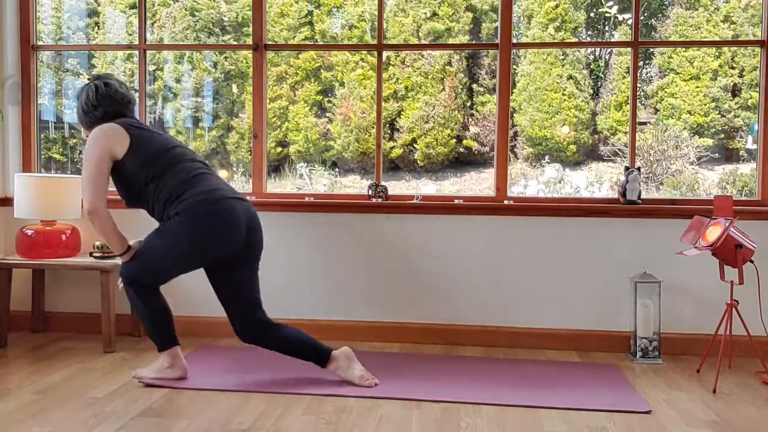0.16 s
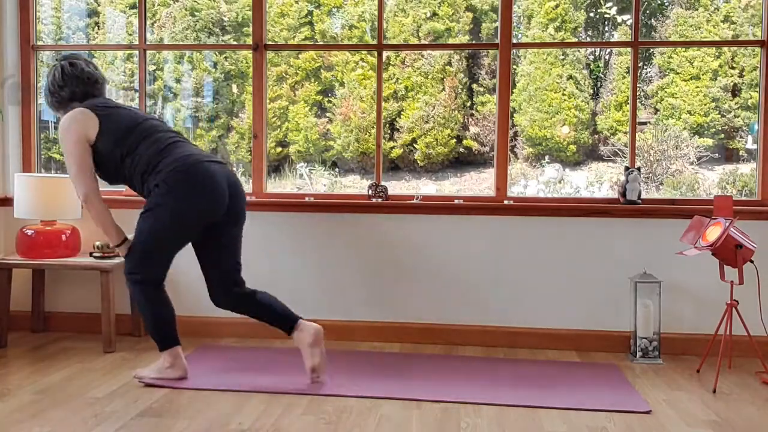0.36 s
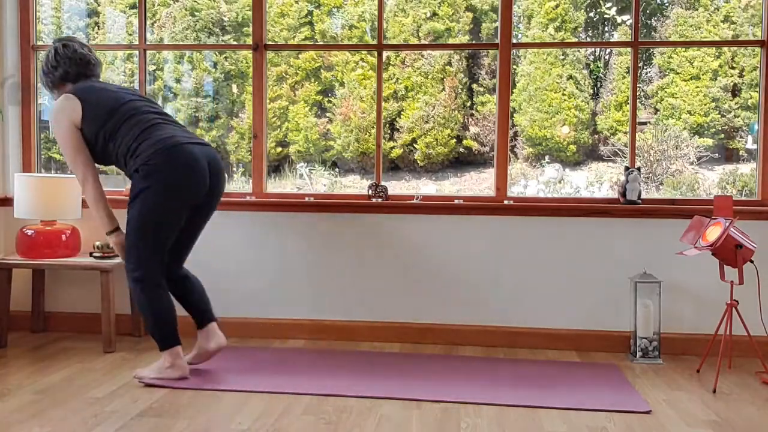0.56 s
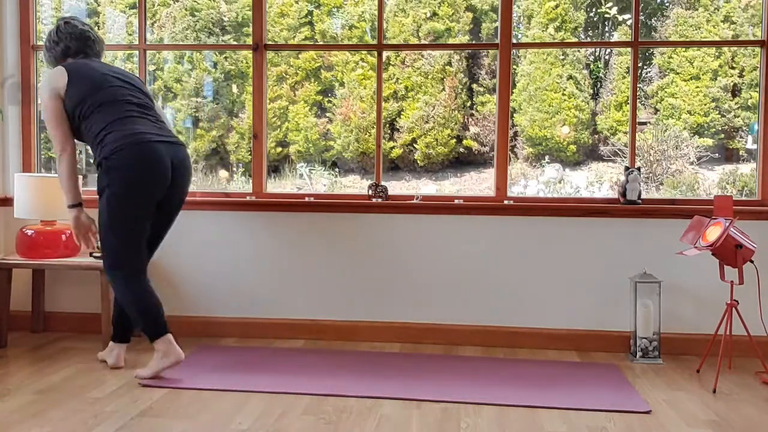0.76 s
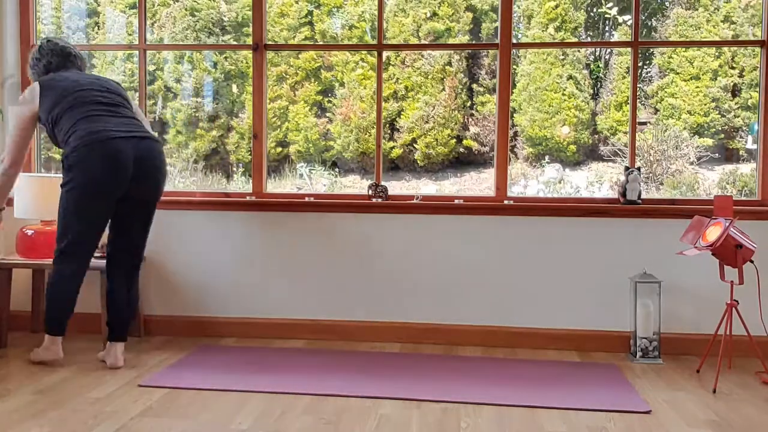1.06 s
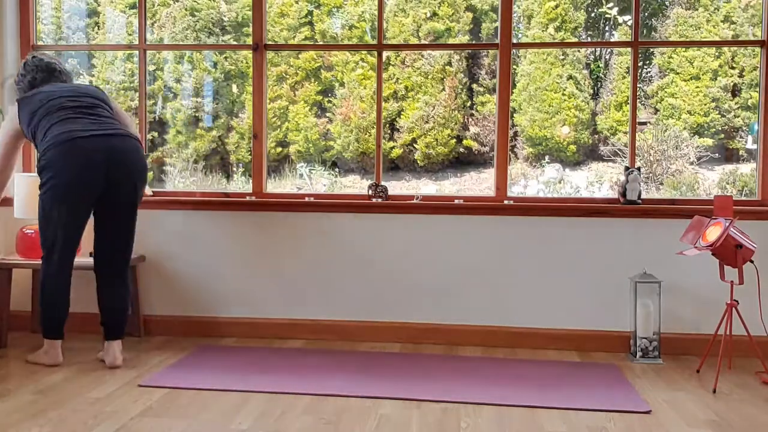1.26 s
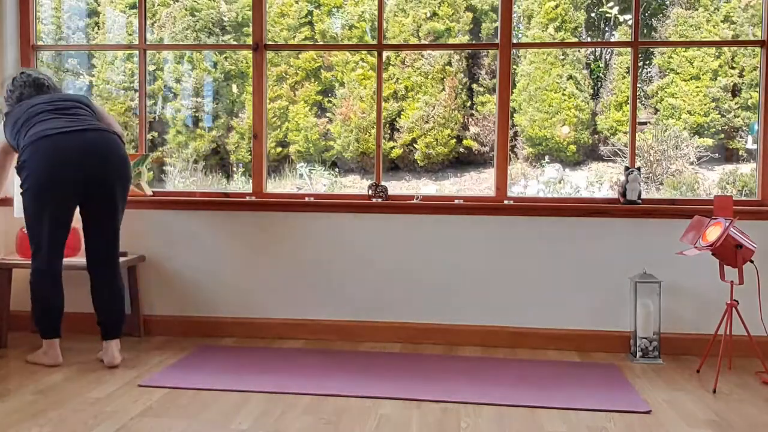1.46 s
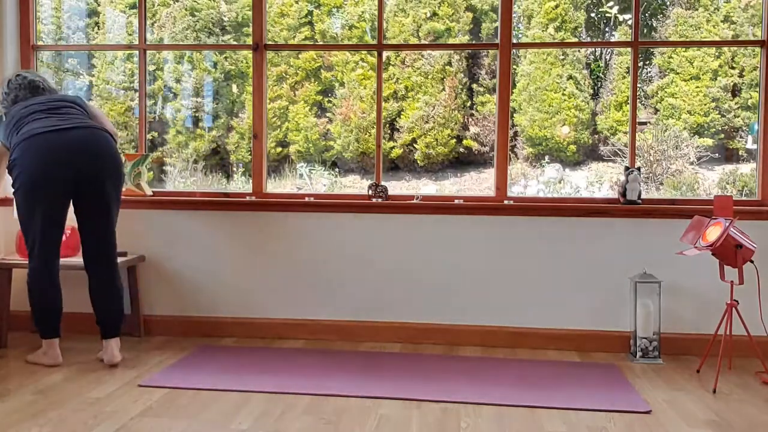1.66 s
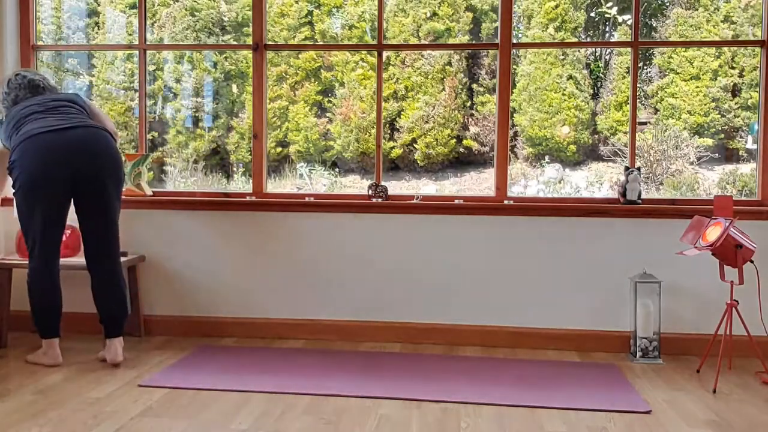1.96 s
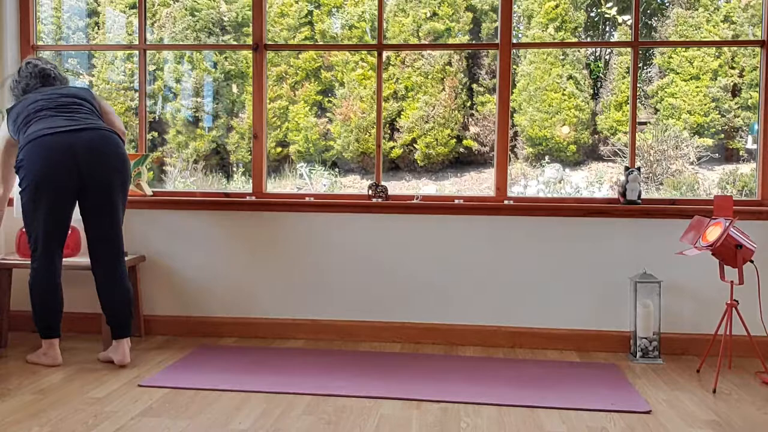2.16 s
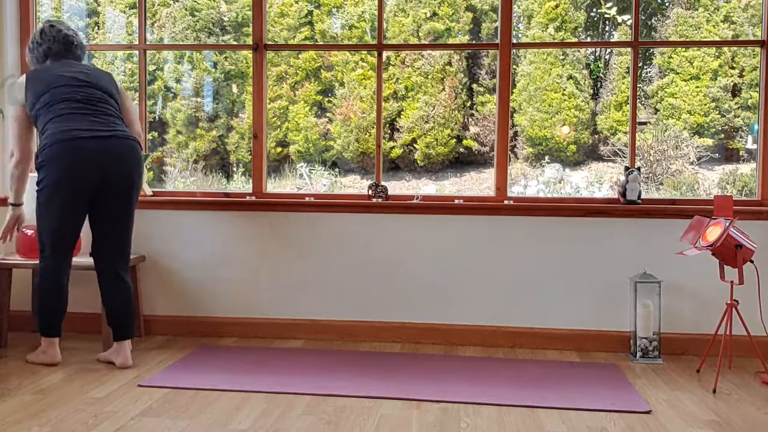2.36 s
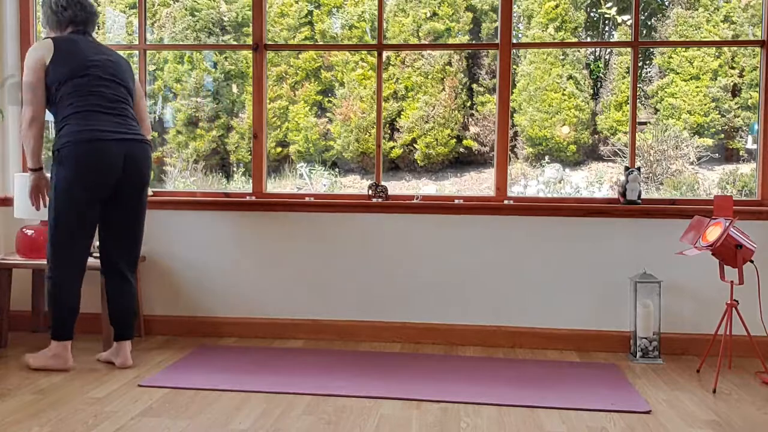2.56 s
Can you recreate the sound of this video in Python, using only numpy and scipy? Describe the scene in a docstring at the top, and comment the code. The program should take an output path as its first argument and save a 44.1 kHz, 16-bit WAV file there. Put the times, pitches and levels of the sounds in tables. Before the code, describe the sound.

Clothing swishes and rustles as someone gets up in a slightly echoing room. A swish and sharp double crack come at 0.2 seconds, light toe taps at 0.5, then a brief squeak and another swish around 0.8. Soft barefoot steps and board ticks follow, with very faint bird chirps from 1.4 to 1.9. The loudest swish comes with bright joint or board cracks around 2.3, over faint hiss.

```python
"""Barefoot rise from a lunge.

Someone rises and steps across a wooden floor in a bright, bare room. Clothing swishes with each big
move and rustles in between. Joints or boards crack sharply; the boards tick and squeak under soft
heel thuds and toe taps. The room rings on over a faint hiss and a far bird."""
import sys
import numpy as np
from scipy import signal
from scipy.fft import rfft, irfft, next_fast_len
from scipy.io import wavfile
from scipy.ndimage import uniform_filter1d, minimum_filter1d

SR = 44100
rng = np.random.default_rng(int(sys.argv[2]) if len(sys.argv) > 2 else 0)


def pcm_store(signal):
    """Save signal as 16-bit PCM."""
    levels = np.round(np.clip(np.atleast_2d(signal), -1, 1) * 32767)
    wavfile.write(sys.argv[1], SR, levels.astype(np.int16).T)


N = 119070
TIME_S = np.arange(N) / SR
FFT_SIZE = next_fast_len(2 * N)
FREQS_HZ = np.maximum(np.fft.rfftfreq(FFT_SIZE, 1 / SR), 1)

# Background hiss spectrum. Each row: frequency in Hz, gain in dB.
HISS_SPECTRUM = [(25, -48.5), (60, -28), (110, -9.5), (165, -2.5), (250, 2.5), (370, -17.5), (600, -4),
                 (800, -18), (1100, -3.5), (1700, -19), (3500, -12.5), (5500, -8), (6600, -10),
                 (7150, -1.5), (8200, -8.5)]
# Hiss envelope. Each row: time in seconds, level in dB.
HISS_ENVELOPE = [(0, -51), (1.7, -53.5), (2.4, -52), (2.7, -63)]
# Garden bird chirps. Each row: centre in seconds, length in seconds, pitch in Hz, level in dB.
CHIRPS = [(1.44, .08, 5000, -66), (1.76, .08, 4950, -58.5), (1.92, 0.056, 4750, -57)]
# Clothing rustle spectrum. Each row: frequency in Hz, gain in dB.
RUSTLE_SPECTRUM = [(40, -25), (350, -10.5), (750, -11), (1200, -1), (1900, -1.5), (2700, 2), (3600, 1.5),
                   (4800, -4.5), (6000, -3), (7100, 0.5), (8200, -9.5)]
# Rustle envelope. Each row: time in seconds, level in dB.
RUSTLE_ENVELOPE = [(0, -48), (.09, -46), (.17, -40), (.45, -45.5), (.55, -43.5), (.65, -40), (.74, -35.5),
                   (1.05, -47.5), (1.2, -46), (1.29, -51), (1.36, -42.5), (1.44, -47.5), (1.49, -44.5),
                   (1.68, -56), (2.03, -55.5), (2.19, -49.5), (2.5, -46), (2.7, -61)]
# Bare feet on boards. Each row: start in seconds, level in dB, attack and decay in seconds,
# thud pitch in Hz, knock relative to thud in dB.
STEPS = [(0.103, -56, .003, .025, 221, 12.5), (.215, -47, .015, 0.092, 219, -1.5),
         (.711, -50.5, 0.00069, 0.035, 230, 6), (.728, -41.5, 0.0056, 0.025, 169, -6),
         (1.09, -65, 0.024, .12, 163, 7.5), (1.35, -56.5, .01, 0.092, 192, -5),
         (1.905, -49.5, 0.015, .05, 175, -29), (2.22, -54, 0.0081, 0.056, 166, -7)]
# Board ticks. Each row: start in seconds, level before filtering in dB, decay in seconds.
TICKS = [(.108, -43, 0.0043), (.708, -40, .006), (1.083, -41, .005), (1.123, -43.5, .005),
         (1.148, -37.5, .003), (1.4676, -45.5, .014), (1.950, -49.5, .001), (2.0983, -42.5, 0.0048)]
# Tick spectrum. Each row: frequency in Hz, gain in dB.
TICK_SPECTRUM = [(40, -30), (400, -7.5), (1200, -3), (1700, 3), (2300, 9), (3300, 11.5), (4800, 5.5),
                 (7100, -1.5), (8200, -16.5)]
# Skin and board squeaks. Each row: peak in seconds, level in dB, pitch in Hz, rise and fall in seconds.
SQUEAKS = [(0.107, -37.5, 3164, 0.018, 0.015), (.711, -21, 2684, 0.0043, 0.0096),
           (.715, -39.5, 2638, .07, 0.045), (1.15, -34.5, 3055, 0.0072, 0.0074),
           (1.48, -44.5, 7020, .012, 0.04), (2.102, -40, 2857, 0.014, 0.0082)]
# Toe taps as the back foot leaves the mat. Each row: start in seconds, level in dB, decay in seconds.
TOE_TAPS = [(0.468, -36.5, 0.02), (0.5034, -23.5, 0.0038), (0.524, -43.5, 0.00075)]
# Woody modes of a tap. Each row: frequency in Hz, width in Hz, gain in dB.
TAP_MODES = [(1190, 110, -5), (1430, 140, 10), (1950, 140, 1.5), (2660, 420, 0.5), (3550, 490, -23),
             (6400, 3100, -21)]
# Cloth swishes. Each row: peak in seconds, level in dB, rise in dB/s, hold in seconds, fall in dB/s.
SWISHES = [(0.225, -23.5, 297, 0.059, 149.5), (0.799, -18.5, 294, 0.075, 130.5),
           (2.255, -13.5, 467, 0.085, 134.5)]
# One spectrum per swish: pushing up, swinging the leg through, straightening the back.
# Each row: frequency in Hz, gain in dB.
SWISH_SPECTRA = [
    [(40, -40.5), (200, -32.5), (380, -28), (800, -43.5), (1200, -8), (1600, -13), (2300, -8), (3300, 3),
     (4000, -4.5), (4800, -12.5), (6500, -10.5), (7200, -29)],
    [(40, -71), (200, -21.5), (380, -26.5), (650, -17), (1050, -4.5), (2300, -6), (3000, 2), (3900, -1),
     (5000, -8), (6700, -10.5), (7200, -17.5)],
    [(40, -55), (200, -44), (380, -54), (800, -24), (1200, -18.5), (1650, -17.5), (2500, -5), (3300, -6.5),
     (4100, -5.5), (5500, -9), (6400, -9), (7150, -4)],
]
# Joint or board cracks. Each row: start in seconds, level in dB, decay in seconds,
# woody ring in dB, treble gain in dB, reverb gain in dB.
CRACKS = [(0.2138, -8.5, 0.0072, 12.5, -1.5, -9.5), (0.2277, -8.5, 0.009, 2.5, -4.5, -6.5),
          (0.8167, -14.5, 0.00024, -3, -23, -7.5), (2.2485, -19, 0.0073, 0, 2, -6),
          (2.276, -7.5, 0.0013, 1.5, 16, -2), (2.305, -12.5, 0.012, -4, 19.5, -0.5)]
# Base spectrum of a crack. Each row: frequency in Hz, gain in dB.
CRACK_SPECTRUM = [(40, -63), (380, -40), (620, -27.5), (900, -32.5), (1300, -18), (2200, -8), (3200, -1),
                  (3900, 0), (4900, -10.5), (5400, -9), (5800, -14), (6300, -6.5), (7200, -14.5),
                  (8200, -27)]
# Woody modes of a crack. Each row: frequency in Hz, width in Hz, share of the ring.
CRACK_MODES = [(599, 120, 0.99), (1295, 380, 0.63), (1885, 150, 0.77), (2160, 170, 0.51), (2570, 240, 0.31)]
# Brief dips in overall level. Each row: centre in seconds, length in seconds, gain in dB.
LEVEL_DIPS = [(0.8131, 0.0059, -21.5), (1.735, 0.0065, -39), (2.2696, 0.0021, -21)]
# Microphone response, steep at the top end. Each row: frequency in Hz, gain in dB.
MIC_RESPONSE = [(20, -6), (7230, -1.5), (7380, -12), (7900, -17), (8150, -28), (8450, -59), (9000, -72.5)]


def undb(db):
    """Decibels to gain."""
    return 10 ** (np.asarray(db) / 20)


def unit_rms(x):
    """Scale to rms 1."""
    return x / np.sqrt(np.mean(x ** 2))


def unit_burst(x):
    """Scale to the energy of 10 ms at rms 1."""
    return x / np.sqrt(np.sum(x ** 2) / (SR * .01))


def envelope(points):
    """Gain over time from (s, dB) points."""
    return undb(np.interp(TIME_S, *np.array(points).T))


def response_db(points):
    """Gain per frequency bin from (Hz, dB) points."""
    hz, db = np.array(points).T
    return np.interp(np.log(FREQS_HZ), np.log(hz), db)


def shape(x, gain_db):
    """Minimum-phase filter with the given response."""
    cepstrum = irfft(np.log(undb(gain_db)), FFT_SIZE)
    cepstrum[1:FFT_SIZE // 2] *= 2
    cepstrum[FFT_SIZE // 2 + 1:] = 0
    return irfft(rfft(x, FFT_SIZE) * np.exp(rfft(cepstrum)), FFT_SIZE)[:N]


def ring(x, hz, width_hz):
    """One resonance."""
    return signal.lfilter(*signal.iirpeak(hz, hz / width_hz, SR), x)


def noise():
    """White noise."""
    return rng.standard_normal(N)


def noise_band(hz, width_hz):
    """Noise through the same resonance twice, rms 1."""
    return unit_rms(ring(ring(noise(), hz, width_hz), hz, width_hz))


def waver(width_hz):
    """Slow random modulator that blurs a tone."""
    return unit_rms(signal.sosfilt(signal.butter(2, width_hz / 2, fs=SR, output="sos"), noise()))


def pulse(start_s, attack_s, decay_s):
    """Exponential attack and decay."""
    age_s = np.maximum(TIME_S - start_s, 0)
    return (1 - np.exp(-age_s / attack_s)) * np.exp(-age_s / decay_s)


def slips(start_s, decay_s, attack_s=0.0009):
    """A dying crowd of tiny slips."""
    return np.sign(noise()) * pulse(start_s, attack_s, decay_s)


def cloth_rub(spectrum, grain_db, grains_per_s=500):
    """Noise whose level jumps as fibres catch and slip, rms 1."""
    jumps_db = grain_db * np.interp(TIME_S * grains_per_s, np.arange(N), noise())
    return unit_rms(shape(noise() * undb(jumps_db), response_db(spectrum)))


def room(x, t60_s, wet_db=-4.5, build_s=0.0097):
    """Direct sound plus a dense, bright tail."""
    tail = noise() * undb(-60 * TIME_S / t60_s) * (1 - np.exp(-TIME_S / build_s))
    tail /= np.sqrt(np.sum(tail ** 2))
    return x + undb(wet_db) * signal.fftconvolve(x, tail)[:N]


def hiss():
    """Faint hiss and low murmur of the room."""
    return unit_rms(shape(noise(), response_db(HISS_SPECTRUM))) * envelope(HISS_ENVELOPE)


def bird(sag_hz_per_s=1200):
    """Thin, slightly falling whistles, blurred by distance."""
    out = 0
    for centre_s, length_s, hz, db in CHIRPS:
        offset_s = TIME_S - centre_s
        phase = 2 * np.pi * (hz * TIME_S - sag_hz_per_s * offset_s ** 2 / 2)
        swell = np.exp(-(2 * offset_s / length_s) ** 2)
        out += undb(db) * waver(width_hz=90) * np.sin(phase) * swell
    return out


def rustle():
    """Quiet cloth noise that follows the body's movement."""
    return cloth_rub(RUSTLE_SPECTRUM, grain_db=2.0) * envelope(RUSTLE_ENVELOPE)


def steps():
    """Soft soles thud on the floor and knock the boards."""
    out = 0
    for start_s, db, attack_s, decay_s, thud_hz, knock_db in STEPS:
        thud = noise_band(thud_hz, width_hz=98)
        knock = undb(knock_db) * noise_band(hz=550, width_hz=260)
        out += undb(db) * (thud + knock) * pulse(start_s, attack_s, decay_s)
    return out


def ticks():
    """Boards tick as the weight shifts."""
    bursts = sum(undb(db) * unit_burst(slips(start_s, decay_s)) for start_s, db, decay_s in TICKS)
    return shape(bursts, response_db(TICK_SPECTRUM))


def squeaks(jitter_hz=55):
    """Brief, unsteady stick-slip tones that swell and fade."""
    out = 0
    for peak_s, db, hz, rise_s, fall_s in SQUEAKS:
        phase = 2 * np.pi * np.cumsum(hz + jitter_hz * waver(width_hz=130)) / SR
        flutter = 1 + .45 * waver(width_hz=110)
        swell = np.exp(-np.maximum((peak_s - TIME_S) / rise_s, (TIME_S - peak_s) / fall_s))
        out += undb(db) * np.sin(phase) * flutter * swell
    return out


def toe_taps(low_cut_hz=800):
    """Light contacts ring a few damped, woody modes."""
    highpass = signal.butter(2, low_cut_hz, "high", fs=SR, output="sos")
    out = 0
    for start_s, db, decay_s in TOE_TAPS:
        touch = signal.sosfilt(highpass, slips(start_s, decay_s))
        modes = sum(undb(mode_db) * ring(touch, hz, width_hz) for hz, width_hz, mode_db in TAP_MODES)
        out += undb(db) * unit_burst(modes)
    return room(out, t60_s=0.18)


def swishes():
    """Cloth rubs faster and faster, holds, then dies away."""
    out = 0
    for (peak_s, db, rise_db_per_s, hold_s, fall_db_per_s), spectrum in zip(SWISHES, SWISH_SPECTRA):
        rise_db = rise_db_per_s * np.maximum(peak_s - TIME_S, 0)
        fall_db = fall_db_per_s * np.maximum(TIME_S - peak_s - hold_s, 0)
        out += cloth_rub(spectrum, grain_db=0.5) * undb(db - rise_db - fall_db)
    return out


def cracks(snap_gain=2.56, treble_hz=6710, treble_octaves=0.32):
    """A joint or board snaps, then slips, ringing woody or bright; the room answers."""
    wood = sum(share * np.exp(-(2 * (FREQS_HZ - hz) / width_hz) ** 2)
               for hz, width_hz, share in CRACK_MODES)
    treble = np.exp(-.5 * (np.log2(FREQS_HZ / treble_hz) / treble_octaves) ** 2)
    out = 0
    for start_s, db, decay_s, wood_db, treble_db, wet_db in CRACKS:
        force = slips(start_s, decay_s)
        force[int(start_s * SR)] += snap_gain
        crack = shape(force, response_db(CRACK_SPECTRUM) + wood_db * wood + treble_db * treble)
        out += room(undb(db) * unit_burst(crack), t60_s=0.43, wet_db=wet_db)
    return out


def scene():
    """Mono sum of all sources; the level dips briefly three times."""
    contacts = cracks() + toe_taps() + room(ticks() + squeaks(), t60_s=.28)
    mix = contacts + swishes() + steps() + rustle() + hiss() + bird()
    dips_db = sum(db * np.exp(-(2 * (TIME_S - centre_s) / length_s) ** 4)
                  for centre_s, length_s, db in LEVEL_DIPS)
    return (mix * undb(dips_db))[None]


def record(dry):
    """Narrow-band microphone, very fast peak limiter, low-pass."""
    ceiling, limiter_s, cutoff_hz = .97, 0.00021, 15500
    mic = shape(dry[0], response_db(MIC_RESPONSE))
    span = int(limiter_s * SR)
    gain = minimum_filter1d(ceiling / np.maximum(np.abs(mic), ceiling), 2 * span + 1)
    smooth_gain = uniform_filter1d(uniform_filter1d(gain, span), span)
    lowpass = signal.ellip(8, .2, 70, cutoff_hz, fs=SR, output="sos")
    return signal.sosfilt(lowpass, mic * smooth_gain)[None]


dry = scene()
out = record(dry)
pcm_store(out)
```